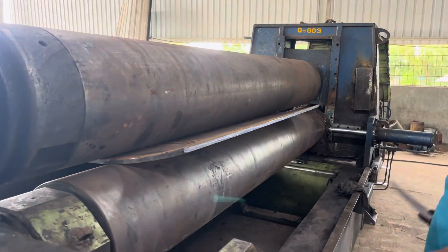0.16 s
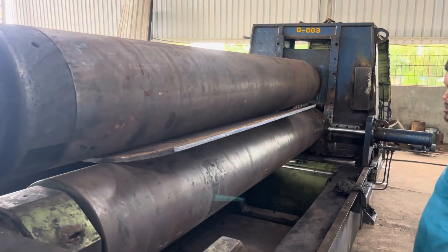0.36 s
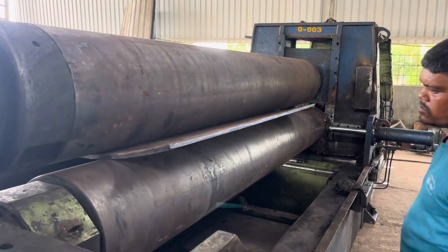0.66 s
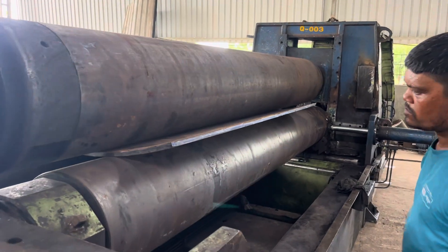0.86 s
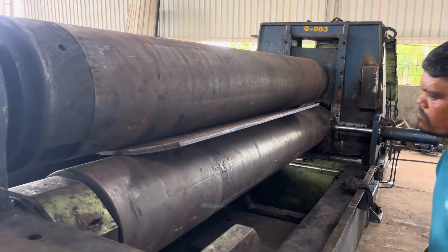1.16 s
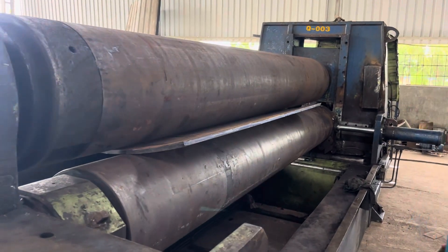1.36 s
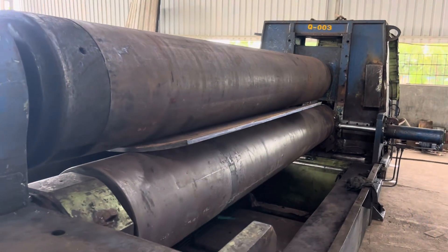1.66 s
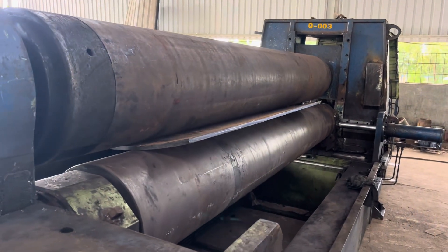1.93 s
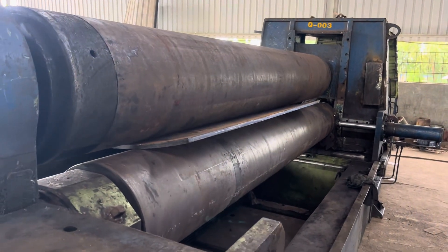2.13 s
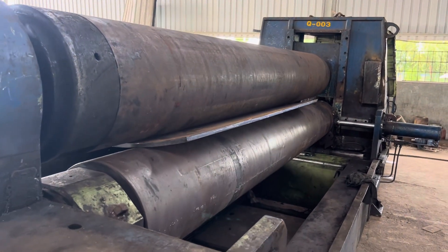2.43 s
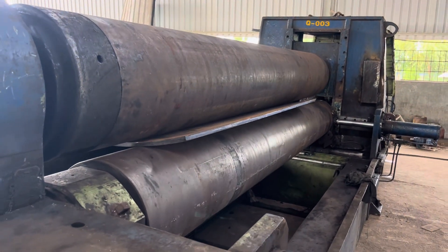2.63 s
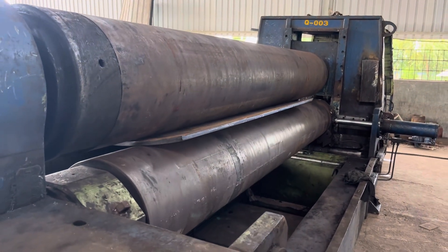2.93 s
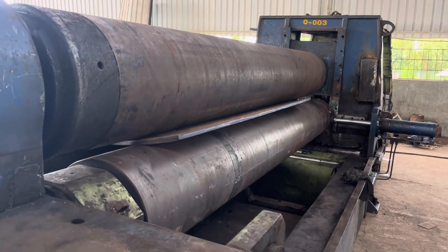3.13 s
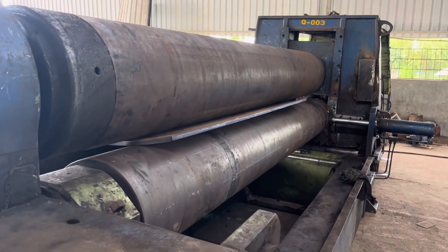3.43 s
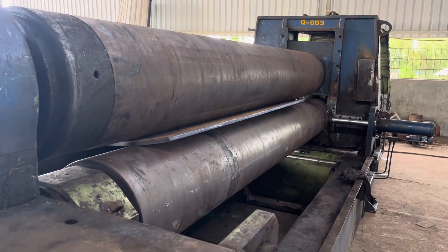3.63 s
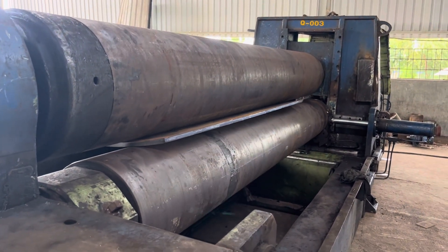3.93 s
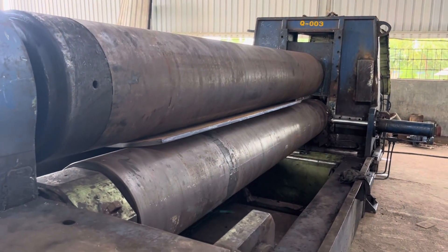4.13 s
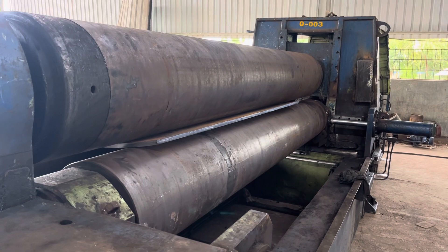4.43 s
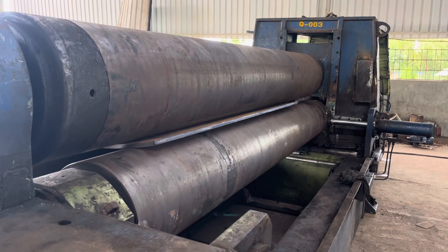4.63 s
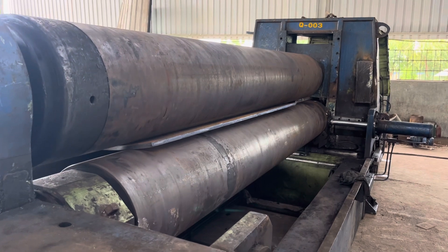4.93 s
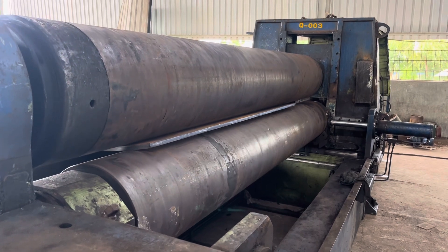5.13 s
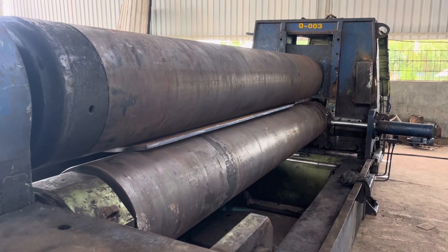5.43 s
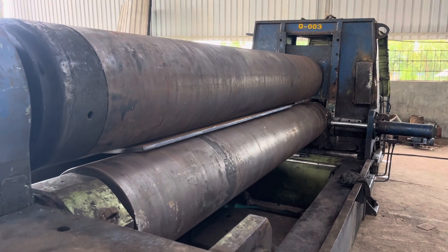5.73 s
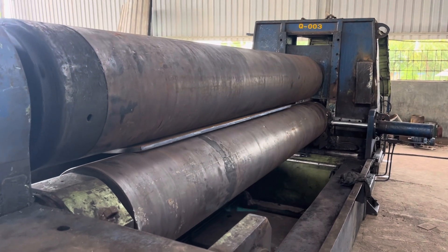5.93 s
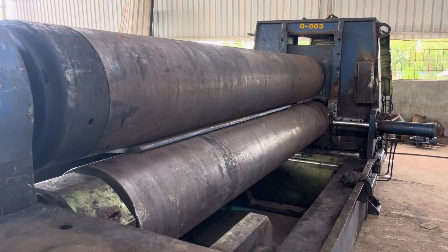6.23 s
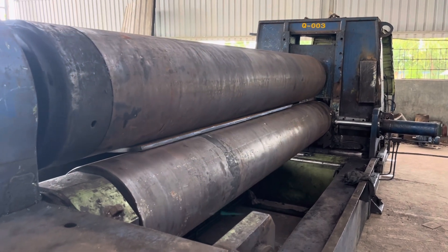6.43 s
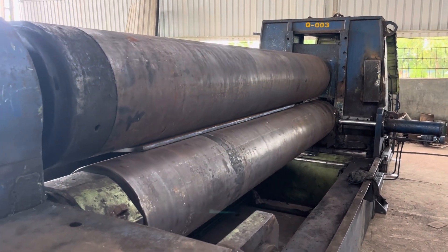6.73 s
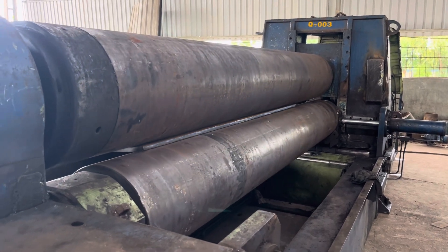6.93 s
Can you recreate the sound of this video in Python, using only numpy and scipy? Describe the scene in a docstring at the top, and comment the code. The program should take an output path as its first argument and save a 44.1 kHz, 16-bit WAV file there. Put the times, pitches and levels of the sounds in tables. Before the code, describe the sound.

In an open steel shed, a plate bending machine's pump hums steadily over the broad low roar of its power pack. Soft low thumps bump the microphone early on. After about four seconds the rolls lurch with a crackle, pause briefly, then grind a steel plate through with scrapes, knocks, creaks and one hard crack, fading at the end. Close hand-held stereo.

```python
"""A plate bending machine in an open steel shed, heard through two hand-held microphone ports.
Its rolls lurch, turn and drag a steel plate through: shaped noise makes the grinding, the slips and
the knocks, which ring the modes of the steel, while creaks and crunches are short shaking tones.
The hydraulic pump whines in a stack of tones over the roar of the power pack, which is coloured noise.
A few low thumps come before the rolling, and one faint ring far off."""
import sys
import numpy as np
from scipy import signal
from scipy.fft import rfft, irfft, next_fast_len
from scipy.io import wavfile
from scipy.ndimage import uniform_filter1d

SR = 44100
rng = np.random.default_rng(int(sys.argv[2]) if len(sys.argv) > 2 else 0)


def put_to_file(sound):
    """Save the sound as 16-bit audio at rate SR, in the file named by the first command-line argument."""
    columns = np.atleast_2d(sound).T  # one column per channel
    safe = np.clip(columns, -1, 1)
    whole_steps = np.round(safe * 32767)
    wavfile.write(sys.argv[1], SR, whole_steps.astype(np.int16))


N = 312228
SIZE = next_fast_len(N + SR)  # room for the echo tail when filtering
HZ, TIME = np.fft.rfftfreq(SIZE, 1 / SR), np.arange(N) / SR
SIDE = np.array([[.5], [-.5]])  # left and right each take half of a difference

# load on the rolls, heard as grinding of the plate: start_s, level_db [dB]
ROLLING = [(4.25, -50), (4.4, -33.5), (4.55, -40), (4.7, -44.5), (4.84, -47), (4.9, -32), (5.2, -30.5),
           (5.4, -28.5), (5.53, -28.5), (5.62, -28.5), (5.74, -29.5), (5.86, -27.5), (5.98, -31),
           (6.1, -28), (6.34, -31.5), (6.45, -28.5), (6.6, -30.5), (6.75, -35), (7.08, -41.5)]
ROLL_START_S = ROLLING[0][0]
# relative colour of the grinding: pitch_hz [Hz], level_db [dB per Hz]
GRIND = [(150, -4), (300, 4), (600, -0.5), (1400, -2), (1750, -11), (3000, -12), (3500, -15), (6000, -20.5),
         (10000, -70), (14300, -48), (15500, -46)]
# modes of plate and rolls: pitch_hz [Hz], level_db [dB], t60_s [s to fall by 60 dB]
STEEL = [(172.5, 9.5, 0.18), (356, 2, 0.22), (495, 4.5, 0.15), (618, 2, 0.15), (695, 3.5, 0.26),
         (1081, 4, 0.12), (1447, -1.5, 0.068), (1603, 4, 0.067), (1804, 5, 0.2), (1910, 3, 0.087),
         (2077, 5, 0.12), (2310, 2, 0.13), (2680, -7, 0.15), (2750, 9, 0.11), (2920, 7.5, 0.14),
         (3070, -1, 0.069), (3460, 1, 0.12), (4053, 3.5, 0.065), (5000, -13, 0.089)]
# slips of the plate, short ones crack, long ones scrape: start_s, level_db [relative dB],
# length_s [nominal s], treble_tilt [dB per octave], body_db [dull part, dB], heave_db [heave of the drive, dB]
SLIPS = [(4.323, -37, 0.005, -3, -11, -4), (4.347, -37, 0.0049, 5, 5, 3.5),
         (4.368, -28.5, 0.006, -5, -4.5, 1), (4.387, -27, 0.0056, 2, -2.5, -3),
         (4.405, -33, .004, -3, -5, 2), (4.413, -34, 0.0042, -5, -2, 0), (4.51, -42, 0.0077, 1, 8, 1),
         (4.46, -43, 0.0054, -7, 4, 2), (4.851, -36.5, .005, 0, 3, 5), (4.874, -28, 0.003, -3, -8, -5),
         (4.978, -32.5, 0.021, -0.5, 6, 4.5), (5.02, -35, 0.02, -1, 5, 0),
         (5.0772, -11.5, 0.002, 8.5, -17, 0), (5.078, -17.5, 0.0041, -5.5, -3.5, 0),
         (5.0795, -16.5, 0.006, -3, -7, -1.5), (5.175, -26, 0.022, -3, -4, 9.5),
         (5.36, -30, 0.005, -8, 4, 2), (5.345, -29, 0.042, -2.5, 4.5, -5),
         (5.5704, -28.5, 0.03, -3.5, 4.5, 3.5), (5.631, -35, 0.017, -7, 5, 0),
         (5.792, -30, 0.027, -3.5, 1, 4), (5.816, -33, 0.0072, 2, 8, 1), (5.977, -41, 0.0055, -1, 8, 3),
         (6.164, -44, 0.0046, -9, 5, 0.5), (6.274, -34, 0.0055, -7.5, 6.5, 3.5),
         (6.0117, -31.5, 0.036, -4, 3.5, 2.5), (6.244, -34, 0.021, -2, -4, -1),
         (6.376, -29, 0.024, -2.5, 3.5, 7.5), (6.558, -46, 0.014, -3, -2, 2)]
# relative colour of the heavy, dull part of slips and knocks: pitch_hz [Hz], level_db [dB per Hz]
BODY = [(150, -15.5), (400, 3.5), (1100, -0.5), (2100, -7.5), (3200, -31), (5000, -56)]
SURGE_GRIND = 0.25  # share of the drive's heave, in dB, that the grinding feels


def amp(db):
    """Turn decibels into a plain multiplier."""
    return 10 ** (np.asarray(db) / 20)


def evened(x):
    """Scale a signal to an rms (average strength) of 1."""
    return x / np.sqrt(np.mean(x ** 2) + 1e-20)


def read(points, hz):
    """Read the columns of a table between its rows, along a logarithmic pitch scale."""
    pitch_hz, *columns = np.transpose(points)
    return np.squeeze([np.interp(np.log(hz + 1), np.log(pitch_hz + 1), column) for column in columns])


def curves(rows):
    """Join the rows of a table by straight lines in time, one curve a column."""
    start_s, *columns = np.transpose(rows)
    return [np.interp(TIME, start_s, column) for column in columns]


def filtered(x, gain):
    """Multiply each frequency of a signal by its own gain."""
    return irfft(rfft(x, SIZE) * gain, SIZE)[..., :N]


def wander(per_s):
    """Smooth random drift of rms 1; a higher per_s (in Hz) drifts faster."""
    return evened(filtered(rng.standard_normal(N), np.exp(-(HZ / per_s) ** 2)))


def bell(start_s, length_s):
    """A smooth rise and fall centred on start_s."""
    return np.exp(-(2 * (TIME - start_s) / length_s) ** 2)


def surge_db():
    """The drive heaves shortly after each slip, as a smooth change of level in dB."""
    delay_s, width_s = 0.053, 0.056
    return sum(row[-1] * bell(row[0] + delay_s, width_s) for row in SLIPS)


def rolling():
    """Dense uneven grit and scattered lumps of scale under the rolls; the drive rumbles below."""
    # relative colour of the drive's rumble: pitch_hz [Hz], level_db [dB per Hz]
    rumble_colour = [(30, -44), (55, 3.5), (100, 9.5), (200, 4), (320, -18), (450, -29.5)]
    rumble_db = -6.5  # against the grinding
    heave_db = surge_db()
    load_db = curves(ROLLING)[0]
    turning = np.clip((TIME - ROLL_START_S) / 0.057, 0, 1)

    # about 70 lumps a second; each swells the grit for some ms
    lump_sizes = amp(0.88 * np.minimum(rng.exponential(1, N), 2.2))
    lumps = (rng.random(N) < 70. / SR) * lump_sizes
    lumpy = 1 + 0.069 * signal.lfilter([1], [1, -np.exp(-1 / (0.0032 * SR))], lumps)
    grit = rng.standard_normal((2, N)) * amp(1.44 * rng.exponential(1, N)) * lumpy
    grind = evened(filtered(grit, amp(read(GRIND, HZ))))

    uneven = rng.standard_normal((2, N)) * amp(0.48 * wander(54.0))
    rumble = evened(filtered(uneven, amp(read(rumble_colour, HZ))))
    both = amp(SURGE_GRIND * heave_db) * grind + amp(rumble_db + heave_db) * rumble
    return turning * amp(load_db) * both


def slips():
    """Each slip or crack is a short burst of grit; its dull body builds up later and lasts longer."""
    # relative colour of the bright part: pitch_hz [Hz], level_db [dB per Hz]
    slip_colour = [(200, -16.5), (1000, -13.5), (3000, -12.5), (7000, -10), (10000, -16), (14000, -24),
                   (15500, -24)]
    count, early = 8000, 100  # samples a slip, and how many of them come before its start
    out, t, hz = np.zeros((2, N)), np.arange(count) / SR, np.fft.rfftfreq(count, 1 / SR)
    # bending waves run faster in the treble: the lag falls with the root of frequency
    lag_s = .003  # at 1 kHz, behind the highest tones
    spread = np.exp(-4j * np.pi * lag_s * np.sqrt(1000 * hz))
    for start_s, level_db, length_s, tilt_db, body_db, _ in SLIPS:
        scrape, shove = rng.standard_normal((2, 2, count))
        scrape *= 1 - np.exp(-t / (0.053 * length_s + 0.0014))
        scrape *= np.exp(-(t / (1.17 * length_s)) ** 1.15)
        shove *= 1.05 * t / (.5 * length_s + 0.0032)
        shove *= np.exp(-t / (0.7 * length_s + 0.0039))
        tilt = tilt_db * np.log2((hz + 100) / 5000)
        bright = amp(level_db + 14.0 + read(slip_colour, hz) + tilt)
        dull = amp(level_db + 14.0 + body_db + read(BODY, hz))
        burst = irfft((rfft(scrape) * bright + rfft(shove) * dull) * spread, count)
        part = out[:, round(start_s * SR) - early:][:, :count]
        part += np.roll(burst, early, 1)
    return out


def knocks():
    """The plate rattles on the rolls: scattered dull knocks of uneven size that follow the load."""
    knocks_per_s, decay_s, size_spread_db = 110, .006, 2.5
    base_db = -8.5  # against the grinding
    sizes = amp(size_spread_db * np.minimum(rng.exponential(1, N), 2.5))
    hits = (rng.random(N) < knocks_per_s / SR) * sizes
    shape = signal.lfilter([1], [1, -np.exp(-1 / (decay_s * SR))], hits)
    shape = uniform_filter1d(shape, size=130)  # a soft start
    dull = evened(filtered(shape * rng.standard_normal((2, N)), amp(read(BODY, HZ))))
    level_db = base_db + curves(ROLLING)[0] + SURGE_GRIND * surge_db()
    return (TIME > ROLL_START_S) * amp(level_db) * dull


def steel(grinding, blows):
    """Plate and rolls ring, most after blows; the contact creeps, driving each mode harder or softer."""
    out = grinding + blows
    drive = amp(-5.5) * grinding + amp(0.5) * blows
    for pitch_hz, level_db, t60_s in STEEL:
        r = 1000 ** (-1 / (t60_s * SR))  # what is left of the ring after one sample
        driven = drive * amp(level_db + 2.2 * wander(11.))
        pole = r * np.exp(2j * np.pi * pitch_hz / SR)
        out += 2 * signal.lfilter([1 - r], [1, -pole], driven).real
    return out


def creaks():
    """The rubbing plate locks on to one mode, which sings roughly; flakes of scale crunch at any pitch."""
    # creaks, each moved to the nearest steel mode: start_s, length_s [before dying away],
    # pitch_hz [Hz], level_db [dB rms before roughness and fades]
    creak_rows = [(4.389, 0.0074, 1445, -28), (4.392, 0.012, 1078, -32), (4.438, 0.032, 1445, -44),
                  (4.387, 0.004, 3460, -44), (4.39, 0.0088, 5100, -42), (4.41, 0.018, 2080, -49),
                  (4.504, .03, 1078, -42), (4.86, 0.034, 172, -29.5), (5.6, 0.057, 1078, -33.5),
                  (5.1, .05, 2738, -47), (5.078, 0.008, 1915, -35), (5.083, 0.054, 2312, -46),
                  (5.078, 0.008, 698, -25), (5.081, 0.028, 1078, -26), (5.079, .007, 495, -26),
                  (6.265, .02, 495, -28), (6.209, 0.053, 1078, -37), (5.368, 0.026, 1078, -36),
                  (5.15, 0.045, 172, -28), (5.21, 0.059, 172, -29), (5.181, 0.1, 2080, -40.5),
                  (5.182, 0.034, 2738, -41), (5.19, .07, 1078, -36), (5.1, 0.056, 1915, -40),
                  (5.4, 0.036, 616, -31), (5.283, 0.051, 3070, -45), (5.322, 0.058, 2400, -46),
                  (5.35, 0.07, 172, -37), (5.576, 0.027, 2080, -33.5), (5.58, 0.038, 1078, -29),
                  (5.59, .05, 172, -28), (5.595, 0.038, 2738, -45), (5.1, .02, 1915, -39),
                  (5.605, 0.026, 495, -29), (5.1, .03, 1607, -37), (5.788, .025, 2080, -37),
                  (5.815, 0.02, 1810, -36), (5.817, .02, 1607, -39), (5.697, 0.19, 2080, -42),
                  (5.698, 0.059, 2660, -48), (5.779, 0.051, 1078, -35), (5.78, 0.146, 172, -30.5),
                  (5.6, 0.051, 2500, -48), (5.875, 0.11, 2312, -55), (5.887, 0.081, 2660, -48),
                  (5.919, 0.069, 3070, -48), (6.6, 0.045, 2915, -43), (6.108, 0.067, 3070, -46),
                  (6.014, 0.027, 1078, -27), (6.012, 0.044, 2080, -44), (6.05, 0.065, 172, -32),
                  (6.18, 0.11, 172, -32.5), (6.073, 0.1, 2312, -45), (6.378, 0.035, 1915, -37),
                  (6.39, 0.07, 172, -27.5), (6.41, 0.054, 1810, -40), (6.43, 0.097, 2915, -46),
                  (6.521, 0.087, 2915, -44.5), (6.71, 0.1, 2915, -54)]
    rise_s, fall_s, rough_db = .002, .009, 2.5
    waver_hz, detune = 24., .005  # rms shake of the pitch; largest share it sits off the mode
    crunch_count, crunch_s = 1300, .007  # the length is a mean, before dying away
    crunch_db = -14.  # base level against the grinding
    out, modes_hz = np.zeros((2, N)), np.transpose(STEEL)[0]
    rough = amp(rough_db * wander(69.0))
    shake = np.cumsum(waver_hz * wander(30.25)) / SR

    when, pitch, size, lasting = rng.random((crunch_count, 4)).T
    start = ROLL_START_S + when * (6.9 - ROLL_START_S)
    tone_hz = 200 * 18 ** pitch  # 200 to 3600 Hz
    load_db = curves(ROLLING)[0] + SURGE_GRIND * surge_db()
    crunch_levels_db = crunch_db + load_db[(start * SR).astype(int)] + read(GRIND, tone_hz) + 7 * size

    rows = [(start_s, length_s, modes_hz[abs(modes_hz - pitch_hz).argmin()], level_db)
            for start_s, length_s, pitch_hz, level_db in creak_rows]
    rows += list(zip(start, 2 * crunch_s * lasting, tone_hz, crunch_levels_db))
    for (start_s, length_s, pitch_hz, level_db), chances in zip(rows, rng.random((len(rows), 3))):
        phase, off, at = chances
        t = np.arange(0, length_s + 6 * fall_s, 1 / SR)
        first = int(at * (N - len(t)))
        own = slice(first, first + len(t))  # a random stretch of roughness and shake
        fade = np.exp(-np.maximum(t - length_s, 0) / fall_s)
        shape = (1 - np.exp(-t / rise_s)) * fade * rough[own]
        turns = pitch_hz * (1 + detune * (2 * off - 1)) * t + shake[own] + phase
        tone = np.array([np.cos(2 * np.pi * turns), -np.sin(2 * np.pi * turns)])
        part = out[:, round(start_s * SR):][:, :len(t)]
        part += np.sqrt(2) * amp(level_db) * shape * tone
    return out


def whine():
    """The pump's steady pressure pulses: two strong orders and faint wavering upper ones."""
    # the two strong orders as the microphones drift through the standing waves:
    # start_s, first_db, second_db [dB rms], first_pan, second_pan [left minus right, dB]
    drift = [(0.0, -40.5, -45, -4, 8), (0.16, -38.5, -44, -7, -6), (0.24, -55, -46, -15, 7),
             (0.35, -37, -41.5, -1, 5), (0.8, -40, -48, -7, 18), (0.95, -33, -41.5, -1, 0),
             (.99, -43, -44, -6, 2), (1.18, -36, -46.5, -4, 14), (1.24, -43, -45, -9, 6),
             (1.45, -43, -39.5, -7, 2), (1.55, -38, -40, -1, 1), (1.77, -44, -38.5, -7, 2),
             (1.87, -34.5, -39, 0, 0), (2.2, -33, -41, 0, -1), (3.3, -34.5, -39, 1, -2.5),
             (4.28, -33.5, -41, 3, 5.5), (4.67, -43.5, -40, 11, 9), (4.89, -37, -39, -5, 9),
             (5.5, -40, -38, 1, 7), (5.9, -41.5, -57, -4, 5), (6.3, -49, -43, -3, 1),
             (6.74, -45, -40, -10, 0), (7.08, -35, -37.5, -1, 1)]
    # short swells of tone near the first order's pitch: start_s [middle], length_s, level_db [dB]
    short_swells = [(0.376, .08, -44), (0.617, 0.021, -36), (0.894, 0.22, -43), (1.03, 0.022, -36),
                    (1.146, 0.14, -39), (4.527, 0.026, -38), (4.742, 0.031, -40), (5.064, 0.028, -28),
                    (5.297, 0.12, -31.5), (5.728, 0.07, -30.5), (6.133, 0.13, -29), (6.515, 0.12, -35.5),
                    (6.652, 0.035, -32.5)]
    # the upper orders: multiple [of the pump pitch], level_db [dB rms before wavering],
    # lead [radians left leads]
    upper = [(3, -55.5, 4), (4, -68, -0.3), (5, -63, 0.5), (6, -64.5, -1.93), (7, -61, 1.5), (9, -81, 1.5),
             (10, -62.5, 1.5), (12, -83, 2), (14, -66, 1.4), (15, -68, -5), (16, -65, 2), (17, -69.5, -3.5),
             (18, -76, 5), (19, -67.5, 2), (21, -71, 1), (22, -70, 2.5)]
    # an upper order swells for a while: multiple, start_s [middle], length_s, level_db [dB rms]
    swells = [(4, 0.85, 0.5, -53), (4, 2.4, .9, -60), (6, 1.92, 1.17, -49.5), (7, 3.6, 1.3, -64),
              (3, 3.4, 1.3, -61), (6, 3.4, 1.1, -61), (6, 4.13, 0.47, -55.5), (12, 1.85, 0.66, -59),
              (12, 3.92, 1.01, -55), (12, 6, 1.8, -65)]
    pump_hz = 272.95  # average number of pressure pulses a second
    loaded_flicker_db = 3.  # under load the first order breaks up
    first_db, second_db, first_pan, second_pan = curves(drift)
    turn = 2 * np.pi * np.cumsum(pump_hz + .5 * wander(6.18)) / SR

    first = amp(first_db) + sum(amp(level_db) * bell(start_s, length_s)
                                for start_s, length_s, level_db in short_swells)
    loaded = np.clip((TIME - ROLLING[1][0]) / .3, 0, 1)
    first = first * amp(loaded_flicker_db * loaded * wander(11.0))
    out = first * amp(SIDE * first_pan + 1.4 * wander(47.0)) * np.cos(turn - .5 * SIDE)
    second = amp(second_db + SIDE * second_pan + 1.04 * wander(30.0))
    out += second * np.cos(2 * turn + 1.04 - 1.06 * SIDE)

    for multiple, level_db, lead in upper:
        order = round(multiple)
        level = amp(level_db) + sum(amp(top_db) * bell(start_s, length_s)
                                    for k, start_s, length_s, top_db in swells if round(k) == order)
        waver = amp(2. * wander(1.0) + 3.0 * wander(15.0))
        out += level * waver * np.cos(order * turn + lead * SIDE + 2 * np.pi * rng.random())
    return np.sqrt(2) * out


def roar():
    """Power pack and shed: random short-time spectra with drifting patches, two unrelated draws."""
    # relative colour of the roar: pitch_hz [Hz], level_db [dB per Hz]
    roar_colour = [(20, -40), (40, -20.5), (65, -6.5), (200, -5), (400, -6), (620, -14.5), (700, -16),
                   (1500, -17), (1900, -23), (3000, -26), (5200, -30.5), (6100, -26), (8000, -21.5),
                   (9600, -30), (10200, -33), (12800, -35), (13800, -28.5), (14400, -30), (15500, -58)]
    # casing resonances: pitch_hz [Hz], width_hz [Hz], boost_db [dB]
    casing = [(70, 21.3, 5), (603, 52, 3), (790, 10, 7), (891, 10.5, 6), (981, 4.6, -5.5), (1195, 130, 0),
              (3245, 8.5, 5), (6200, 25, 8)]
    # the roar shifts as the microphones drift: start_s, level_db, bass_db, treble_db [dB]
    shifts = [(0, -35, -5.5, 0), (.7, -35, 3, 0.5), (1.4, -33.5, 1, -3), (2.5, -35, -1.5, -2),
              (4.2, -34.5, 0.5, -2), (4.8, -32, -2, -4.5), (5.5, -32, 5, -4.5), (6.3, -37.5, 4.5, -1.5),
              (7.08, -31, -2.5, -9.5)]
    frames, hz = N // 256 + 5, np.fft.rfftfreq(1024, 1 / SR)
    a, b, c, d, patches = rng.standard_normal((frames, 513, 5)).T
    patches = evened(uniform_filter1d(uniform_filter1d(patches, 8, 0), 30, 1))
    colour_db = read(roar_colour, hz)[:, None] + 1.05 * patches
    spectra = np.array([a + 1j * b, c + 1j * d]) * amp(colour_db)
    noise = signal.istft(spectra, nperseg=1024, noverlap=768)[1][:, :N]
    peaks = 1 + sum(amp(boost_db) / (1 + (2 * (HZ - pitch_hz) / width_hz) ** 2)
                    for pitch_hz, width_hz, boost_db in casing)
    noise = evened(filtered(noise, peaks))
    bass = filtered(noise, 1 / (1 + (HZ / 200) ** 4))
    treble = filtered(noise, 1 - 1 / (1 + (HZ / 5500) ** 4))
    level_db, bass_db, treble_db = curves(shifts)
    return amp(level_db) * (noise + (amp(bass_db) - 1) * bass + (amp(treble_db) - 1) * treble)


def thumps():
    """Soft low pushes at the microphone that swing a few times, in an uneven flutter of low noise."""
    # thumps: start_s, level_db [relative dB], pitch_hz [Hz], t60_s [s to fall by 60 dB]
    pushes = [(0.351, -42, 60, .15), (0.976, -16, 53.7, 0.12), (0.999, -8, 53, 0.13),
              (1.0675, -8, 106, 0.053), (1.1, -21, 49, .3), (1.093, -20, 95, 0.056),
              (1.113, -25, 72, 0.079), (1.136, -13.5, 65, 0.14), (1.172, -11.5, 64, 0.1),
              (1.203, -24, 60, 0.19), (1.262, -27, 100, .07), (1.325, -32, 70, 0.09),
              (1.356, -25, 65.5, 0.12)]
    flutter_s, flutter_db, rise_s, fall_s = 1.08, -33, 0.08, 0.26  # flutter_s is its strongest moment
    flutter = filtered(rng.standard_normal(N), (HZ / 60) / (1 + (HZ / 120) ** 3))
    swell = np.exp(-((TIME - flutter_s) / np.where(TIME < flutter_s, rise_s, fall_s)) ** 2)
    out = swell * amp(flutter_db + 1.7 * wander(25.)) * evened(flutter)
    for start_s, level_db, pitch_hz, t60_s in pushes:
        t = np.maximum(TIME - start_s, 0)
        soft_start = 1 - np.exp(-t * pitch_hz / 1.2)
        out += amp(level_db - 60 * t / t60_s) * soft_start * 2 * np.sin(2 * np.pi * pitch_hz * t)
    return out


def ping():
    """One faint, far, soft ring: a sine that dies quickly."""
    # the ring: start_s, level_db [relative dB], pitch_hz [Hz], t60_s [s to fall by 60 dB]
    ring = (2.6, -45, 1000, .2)
    start_s, level_db, pitch_hz, t60_s = ring
    t = np.maximum(TIME - start_s, 0)
    soft_start = np.minimum(t / .01, 1)
    return amp(level_db - 60 * t / t60_s) * soft_start * 2 * np.sin(2 * np.pi * pitch_hz * t)


def shed(x):
    """Echo of the shed: sparse taps of random sign, each band dying at its own speed."""
    # how long the echo lasts: pitch_hz [Hz], t60_s [s to fall by 60 dB]
    echo_times = [(100, 0.47), (1000, 0.99), (4000, 0.43), (12000, 0.3)]
    taps = np.zeros((2, SR))
    at = np.arange(400, SR - 20, 20) + rng.integers(0, 20, (2, (SR - 401) // 20))
    np.put_along_axis(taps, at, rng.choice([-1., 1.], at.shape), 1)
    hz, t, spectra = signal.stft(taps, SR, nperseg=256)
    dying = amp(-60 * t / read(echo_times, hz)[:, None])
    tail = signal.istft(spectra * dying, SR, nperseg=256)[1][:, :SR]
    return filtered(x, rfft(tail / np.linalg.norm(tail[0]), SIZE))


def stereo_width(pair):
    """Stereo width by pitch: the right channel mixes phase-turned left sound with unrelated sound."""
    # how alike left and right sound at each pitch: pitch_hz [Hz], likeness [0 to 1],
    # lead [radians left leads]
    width_rows = [(50, .995, 0), (90, .99, -.05), (160, .96, -.1), (250, .92, -.2), (600, .68, -.3),
                  (900, .5, .4), (1150, .4, 1), (1450, .1, 0), (1750, .3, -.8), (1900, .68, .2),
                  (2400, .56, .4), (2900, .56, 1), (4000, .38, .3), (5000, .3, .5), (5500, .3, -1.1),
                  (6500, .6, -1.2), (7500, .75, -2.6), (7800, 1, -np.pi), (8850, 1, -np.pi),
                  (11100, 1, -2 * np.pi), (13050, 1, -2 * np.pi), (14550, 1, -3 * np.pi), (9100, .8, -3.5),
                  (9600, .7, -4.2), (10200, .4, -5), (10700, .7, -5.9), (13300, .6, -7.2),
                  (14300, .66, -8.6)]
    same, lead = read(sorted(width_rows), HZ)
    same = np.clip(same, 0, 1)
    left, other = rfft(pair, SIZE)
    right = (same * left + np.sqrt(1 - same ** 2) * other) * np.exp(-1j * lead)
    return irfft(np.array([left, right]), SIZE)[:, :N]


def scene():
    """Slips and knocks ring the steel, directly and by their echo; the other sounds are added."""
    blows = slips() + knocks()
    machine = steel(rolling(), blows + amp(-13.0) * shed(blows)) + creaks()
    return stereo_width(roar() + machine) + whine() + thumps() + ping()


def record(dry):
    """Cut deep bass; lean right in the bass and left in most of the treble; then limit the band."""
    edge_hz = 15600
    # pitch in Hz, left minus right in dB
    lean_db = read([(100, -0.75), (1500, -0.98), (2000, 1.2), (7000, 1.7), (8000, -0.25)], HZ)
    bass_cut = 1 - 1 / (1 + (HZ / 36) ** 6)
    leaned = filtered(dry, amp(SIDE * lean_db) * bass_cut)
    band_limit = signal.firwin(511, edge_hz, window=("kaiser", 9), fs=SR)
    return signal.oaconvolve(leaned, band_limit[None], "same")


dry = scene()
out = record(dry)
put_to_file(out)
```